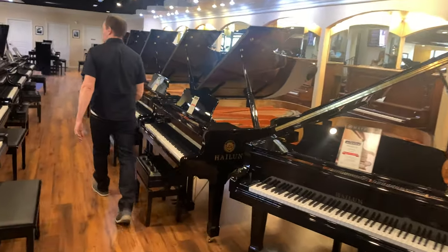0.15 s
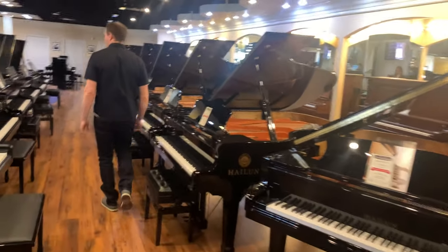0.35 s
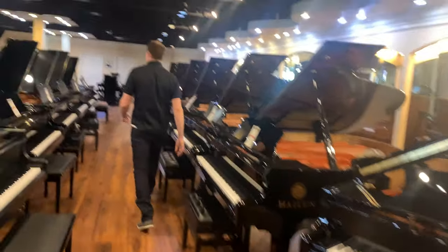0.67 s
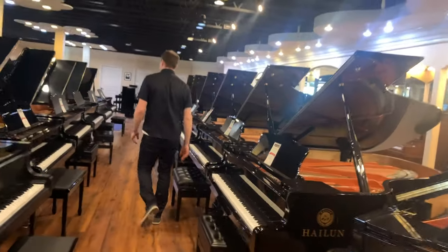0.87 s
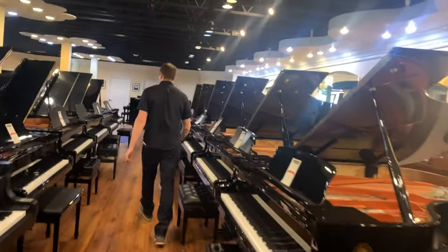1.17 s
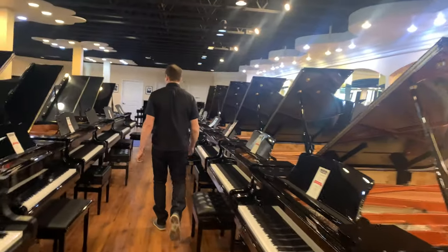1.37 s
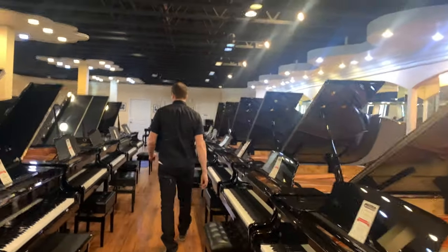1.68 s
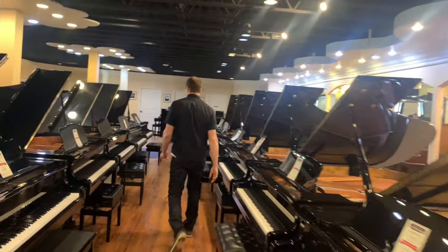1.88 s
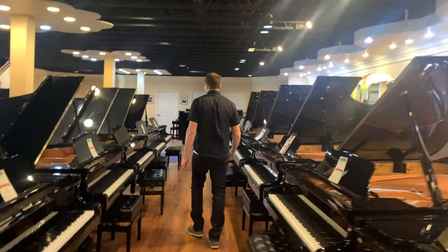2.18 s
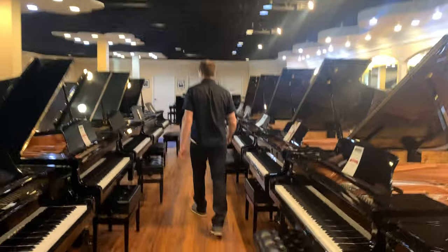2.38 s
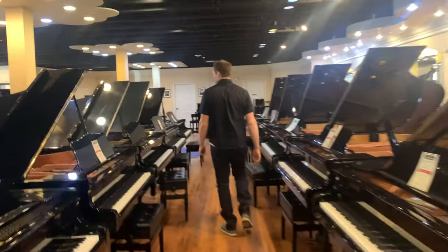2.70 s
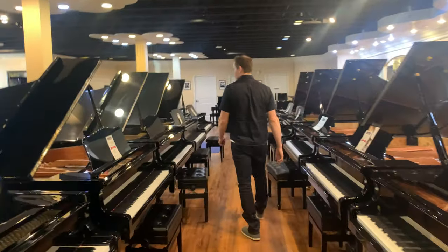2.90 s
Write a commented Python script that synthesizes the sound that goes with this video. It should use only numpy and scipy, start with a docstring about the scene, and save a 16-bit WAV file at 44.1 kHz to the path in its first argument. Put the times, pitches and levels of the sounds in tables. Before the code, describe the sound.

Footsteps at a steady pace on a wooden floor in a large showroom.

```python
"""Footsteps at a steady pace on the wooden floor of a large showroom, a few metres ahead of the microphone.
Each heel and sole gives a click and a thud that falls in pitch, as bending waves in the boards carry the
treble fastest. Shoes scuff and the floor booms under the weight; a few faint bursts of high hiss come late.
Furniture and hall answer the steps, over quiet ventilation."""
import sys
import numpy as np
from scipy import signal
from scipy.fft import rfft, irfft
from scipy.io import wavfile

SR = 44100
rng = np.random.default_rng(int(sys.argv[2]) if len(sys.argv) > 2 else 0)


def wav_out(sig):
    """Save sig, one row per channel (or a flat mono array), as 16-bit PCM at SR to the path in sys.argv[1]."""
    wavfile.write(sys.argv[1], SR, np.round(np.clip(np.atleast_2d(sig).T, -1, 1) * 32767).astype(np.int16))


N = 134505
FFT_SIZE = 3 * 2 ** 16
HZ = np.maximum(np.arange(FFT_SIZE // 2 + 1) * SR / FFT_SIZE, 1)
T = np.arange(N) / SR

# room tone of the ventilation: frequency_hz, level_db
VENTILATION_SPECTRUM = [(20, -8), (35, -17), (58, 5), (90, -6), (160, -5.5), (330, -12), (600, -20),
                        (1200, -26.5), (2000, -25), (4000, -38), (6500, -45), (9000, -40), (12000, -52.5),
                        (15000, -40.5)]
# decay of the hall (a band with a negative time swells instead): frequency_hz, t60_s
HALL_DECAY = [(70, -1.5), (170, 0.99), (400, 0.48), (1000, 0.76), (2800, 0.27), (7000, 0.8), (14000, -2.91)]
# colour of the reverberation: frequency_hz, level_db
HALL_SPECTRUM = [(70, 8), (200, -3), (400, -4.5), (1000, -3.5), (2500, -4), (5000, -4.5), (12000, -9.5)]
# lingering modes of floor and hall: pitch_hz, level_db, t60_s
ROOM_MODES = [(171.9, -13.5, .5), (214.4, -9.5, .5), (359.4, -10, 0.49), (420.4, -3.5, 0.31),
              (446, -3, 0.29), (599, -8, 0.6), (725, -9.5, 0.29), (795, 1.5, 0.37)]
# reflections off the furniture: delay_s, level_db
FURNITURE_ECHOES = [(.0115, -15.5), (0.0171, -14), (0.0199, -17)]
# treble that the shoe shades from the microphone: frequency_hz, gain_db
SHOE_SHADE = [(2200, -1), (3200, -9), (4500, -9.5), (6500, -8.5), (9000, 0), (15000, -11)]
# stereo balance of the short paths: frequency_hz, left_minus_right_db
NEAR_BALANCE = [(80, -5), (200, -1.5), (350, -11.5), (500, -2.5), (1200, 1), (8000, -3)]
# the floor giving under the weight: start_s, pitch_hz, level_db, t60_s
FLOOR_BOOMS = [(0.183, 110.6, -36.5, 0.42), (1.003, 127, -36, 0.235), (1.016, 71.2, -31.5, .6),
               (1.105, 76.2, -34, 0.75), (2.359, 77.4, -42.5, 0.37)]
# faint, thin bursts of narrow hiss near 8.5 kHz: start_s, length_s, level_db
HIGH_HISS_BURSTS = [(2.24, 0.057, -83), (2.477, 0.037, -71.5), (2.53, 0.18, -83.5), (2.735, 0.029, -69.5)]
# soles rubbing the boards: start_s, length_s, level_db, cutoff_hz
SHOE_SCUFFS = [(0.0, 0.01, -56.5, 6480), (0.113, 0.059, -51, 700), (0.146, 0.14, -60, 1900),
               (0.428, 0.037, -54.5, 15000), (0.641, 0.02, -54.5, 900), (.668, 0.033, -51, 14360),
               (0.989, 0.016, -53, 9000), (1.58, 0.047, -52.5, 3500), (1.767, .012, -51.5, 4580),
               (2.086, 0.069, -54, 3700), (2.409, .03, -54, 1704), (2.602, 0.074, -49.5, 2800),
               (2.47, 0.033, -60.5, 5880)]
# colour of a scuff: frequency_hz, level_db
SCUFF_SPECTRUM = [(100, 0), (350, -4), (700, -3.5), (1400, -9.5), (2400, -7), (3200, -6.5), (4400, -4.5),
                  (6800, -15.5), (8700, -14), (11000, -19), (15000, -20.5)]
# colour of a shoe's click: frequency_hz, level_db
CLICK_SPECTRUM = [(60, -11), (250, -18.5), (700, 7.5), (1100, -3.5), (2000, -4.5), (2800, -5.5),
                  (4000, -8.5), (5600, -16.5), (7200, -23.5), (8800, -32), (15000, -40)]
# colour of the boards' thud: multiple_of_pitch, level_db
THUD_SPECTRUM = [(.1, -56.5), (.33, -24.5), (.5, -13), (.72, -9), (.92, -2), (1.07, 1), (1.3, -9),
                 (1.9, -14.5), (2.7, -19.5), (3.8, -28), (5.5, -56.5), (11.0, -66.5), (30.0, -79.5)]
# heels and soles landing: start_s, thud_db, thud_hz, click_db, click_hz, click_cutoff_hz, bass_lag_ms
FOOTFALLS = [(0.1175, -39, 372, -70, 1500, 3020, 2.12), (0.6632, -24, 312, -13, 1730, 15500, 1.08),
             (1.0912, -24.5, 324, -19, 2500, 7000, 1.9), (1.1207, -16, 466, -16.5, 1188, 3900, 1.41),
             (1.587, -10.5, 363.6, -30.5, 3050, 4200, 2.895), (1.6634, -25, 355, -18, 2446, 3200, 1.49),
             (1.678, -37, 450, -30, 2130, 5500, 1.3), (2.0955, -11, 352, -28.5, 1230, 5000, 2.46),
             (2.1674, -18, 348.4, -25, 2005, 5000, 1.5), (2.179, -35, 540, -33, 1500, 3080, 0.2),
             (2.551, -40, 850, -79, 908, 1200, 1), (2.6012, -7, 417.7, -23, 1400, 3200, 3),
             (2.666, -30, 422, -35.5, 1960, 4640, 1.7), (3.013, -64, 420, -60, 2500, 4200, 0.5)]


def undb(db):
    """Decibels to gain."""
    return 10 ** (np.asarray(db) / 20)


def curve(points, at):
    """A table read along a log axis."""
    x, y = np.array(points).T
    return np.interp(np.log(at), np.log(x), y)


def bins(size):
    """Frequencies of a response of this many samples."""
    return np.maximum(np.arange(size // 2 + 1) * SR / size, 1)


def minimum_phase(gain):
    """The promptest response that has this gain."""
    cepstrum = irfft(np.log(gain))
    cepstrum[1:len(cepstrum) // 2] *= 2
    cepstrum[len(cepstrum) // 2 + 1:] = 0
    return np.exp(rfft(cepstrum))


def delay(seconds):
    """Response of a delay."""
    return np.exp(-2j * np.pi * HZ * seconds)


def lowpass(cutoff_hz, at=HZ):
    """Gain of a roll-off of 18 dB an octave."""
    return 1 / np.sqrt(1 + (at / cutoff_hz) ** 6)


def decay(age, t60):
    """Envelope that falls 60 dB in t60 seconds."""
    return np.exp(-np.log(1000) * age / t60)


def noise(gain):
    """Coloured noise of unit level."""
    x = irfft(rfft(rng.standard_normal(FFT_SIZE)) * gain)[:N]
    return x / x.std()


def spread(mid, side):
    """Left and right from mid and side."""
    return np.array([mid + side, mid - side])


def pan(left_minus_right_db):
    """Left and right gains."""
    return undb(np.array([[0.5], [-0.5]]) * left_minus_right_db)


def ventilation(level_db=-59, waver_db=1):
    """Room tone: soft wavering rumble and hiss, the bass alike on both sides."""
    mid = undb(curve(VENTILATION_SPECTRUM, HZ))
    side = mid * curve([(80, 0.13), (500, 0.95)], HZ)
    side_level = np.sqrt(np.sum(side ** 2) / np.sum(mid ** 2))
    air = spread(noise(mid), side_level * noise(side))
    return air * undb(level_db + waver_db * noise(lowpass(6)))


def hall(predelay_s=0.00067, build_s=0.0014, width=0.88, tail_db=-24.5, tail_t60_s=1.7):
    """Response of the far hall: bands of dense echoes, each at its own rate, with a faint long tail."""
    size = 49152
    f, t = bins(size), T[:size]
    centres = np.geomspace(60, 15360, 9)
    white = rfft(rng.standard_normal((2, size)))
    build = 1 - np.exp(-np.maximum(t - predelay_s, 0) / build_s)
    echoes = 0
    for hz, this_band in zip(centres, np.eye(len(centres))):
        band = irfft(white * np.interp(np.log(f), np.log(centres), this_band))
        early = build * decay(t, curve(HALL_DECAY, hz))
        tail = build * decay(t, tail_t60_s)
        envelope = np.hypot(early / np.linalg.norm(early), undb(tail_db) * tail / np.linalg.norm(tail))
        echoes += band * envelope * undb(curve(HALL_SPECTRUM, hz))
    stereo = spread(echoes[0], width * echoes[1]) / np.hypot(1, width)
    return rfft(pan(-0.3) * stereo, FFT_SIZE)


def near_paths(echo_cutoff_hz=1530, mode_feed_per_s=83, right_lag_s=0.00002):
    """Short paths to the microphone: shaded direct sound, dull furniture echoes and lingering modes."""
    t = T[:SR]
    direct = undb(curve(SHOE_SHADE, HZ))
    furniture = lowpass(echo_cutoff_hz) * sum(undb(db) * delay(lag) for lag, db in FURNITURE_ECHOES)
    modes = sum(undb(db) * np.cos(2 * np.pi * hz * t) * decay(t, t60) for hz, db, t60 in ROOM_MODES)
    paths = direct + furniture + rfft(modes, FFT_SIZE) * mode_feed_per_s / SR
    left, right = paths * pan(curve(NEAR_BALANCE, HZ))
    lag_rad = lowpass(1100) * (1 - lowpass(440))  # the right side lags further in the low mids
    return np.array([left, right * delay(right_lag_s) * np.exp(-1j * lag_rad)])


def floor_booms(attack_s=0.013, rumble_gain=0.47):
    """The whole floor swells under the weight: a low tone with some rumble about it."""
    booms = 0
    for start, hz, db, t60 in FLOOR_BOOMS:
        age = np.maximum(T - start, 0)
        swell = (1 - np.exp(-age / attack_s)) * decay(age, t60)
        rumble = rumble_gain * noise(lowpass(3 * hz) * (1 - lowpass(hz)))
        booms += undb(db) * swell * (np.sin(2 * np.pi * hz * age) + rumble)
    return booms


def burst(start, length, attack_s=0.0046, release_s=0.0033):
    """Envelope of a short burst: attack, hold, release."""
    return np.clip((T - start) / attack_s, 0, 1) * np.exp(-np.maximum(T - start - length, 0) / release_s)


def scuffs_and_hiss(hiss_hz=8500, half_width_hz=410, grain_db=4.5):
    """Grainy scuffs of soles rubbing on wood, and faint, thin bursts of narrow hiss."""
    scuff_colour = undb(curve(SCUFF_SPECTRUM, HZ))
    soles = sum(undb(db) * burst(start, length) * noise(scuff_colour * lowpass(cutoff_hz))
                for start, length, db, cutoff_hz in SHOE_SCUFFS)
    narrow_band = noise(1 / (1 + ((HZ - hiss_hz) / half_width_hz) ** 2))
    hiss = narrow_band * sum(undb(db) * burst(start, length) for start, length, db in HIGH_HISS_BURSTS)
    return (soles + hiss) * undb(grain_db * noise(lowpass(200)))


def dispersed_pulse(gain, lag_s, f):
    """A pulse of unit peak in which each frequency arrives with its own lag."""
    phase = 2 * np.pi * np.cumsum(lag_s) * f[1]
    pulse = irfft(minimum_phase(gain) * np.exp(-1j * phase))
    return pulse[:len(f)] / np.abs(pulse).max()


def footfall(start, thud_db, thud_hz, click_db, click_hz, click_cutoff_hz, bass_lag_ms):
    """Heel or sole lands: a briefly ringing click, and a thud whose bass comes late through the boards."""
    f = bins(4096)
    # bending waves travel at a speed that grows with the root of frequency
    slowness = np.sqrt(thud_hz / np.maximum(f, thud_hz / 2))
    bending_lag_s = bass_lag_ms / 1000 * slowness * lowpass(2 * thud_hz, f)
    thud = dispersed_pulse(undb(curve(THUD_SPECTRUM, f / thud_hz)), bending_lag_s, f)
    ring_db = 5.5 * np.exp(-(np.log2(f / click_hz) / 0.75) ** 2)  # broad resonance at the click's pitch
    click_colour = undb(curve(CLICK_SPECTRUM, f) + ring_db) * lowpass(click_cutoff_hz, f)
    click = dispersed_pulse(click_colour, lag_s=0.00052 * lowpass(click_hz, f), f=f)
    sound = undb(thud_db) * thud + undb(click_db) * click
    return np.pad(sound, (int(start * SR), N))[:N]


def scene():
    """The walker a few metres off; one set of hall echoes fades into another along the way."""
    steps = sum(footfall(*row) for row in FOOTFALLS) + scuffs_and_hiss()
    angle = np.pi * T / T[-1]
    far = sum(rfft(steps * share, FFT_SIZE) * hall() for share in (np.cos(angle), np.sin(angle)))
    near = rfft(steps, FFT_SIZE) * near_paths()
    return irfft(near + far)[:, :N] + floor_booms() * pan(-3) + ventilation()


def record(dry, cutoff_hz=15400):
    """The recorder cuts the top treble steeply."""
    return signal.sosfilt(signal.ellip(8, 0.2, 70, cutoff_hz, fs=SR, output="sos"), dry)


dry = scene()
out = record(dry)
wav_out(out)
```